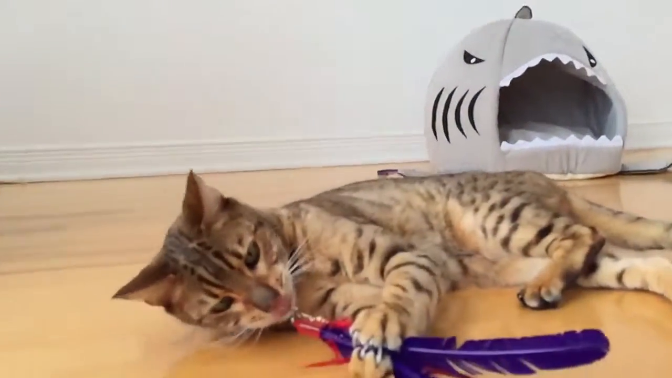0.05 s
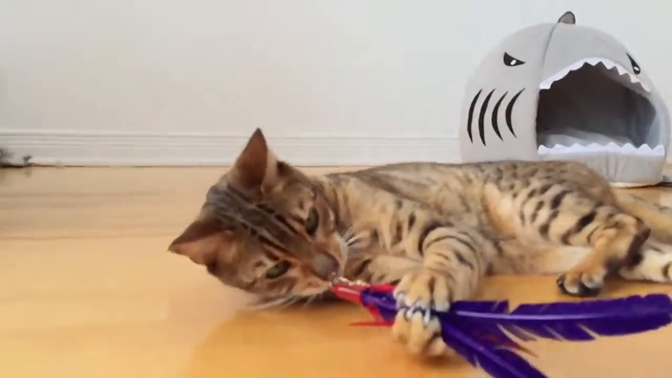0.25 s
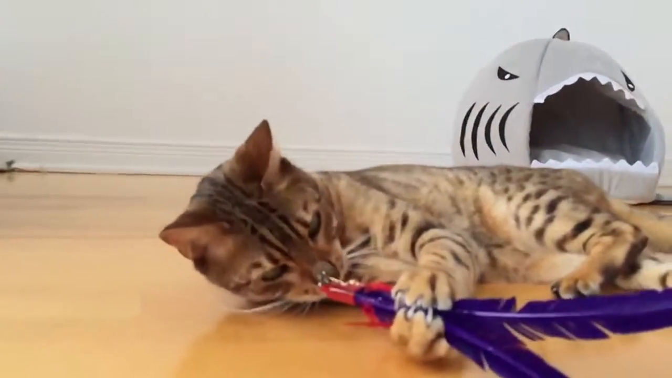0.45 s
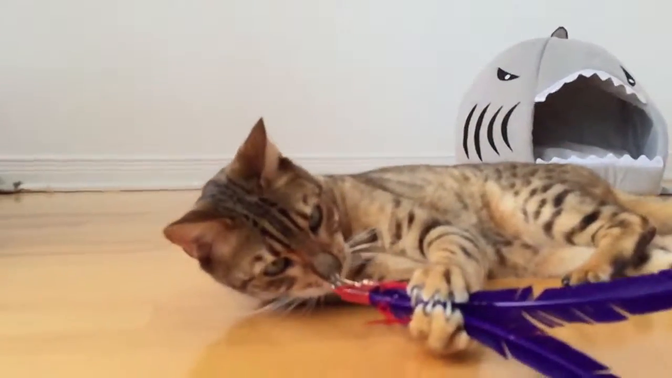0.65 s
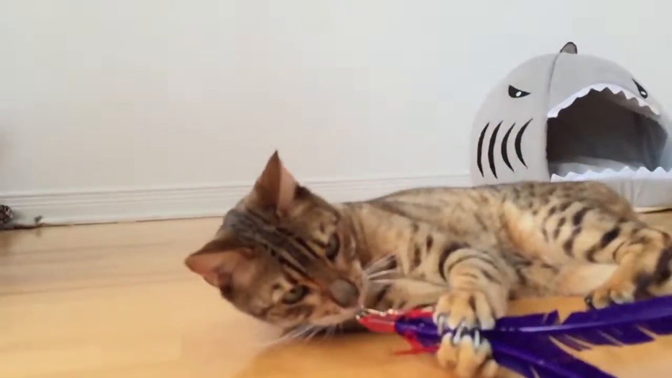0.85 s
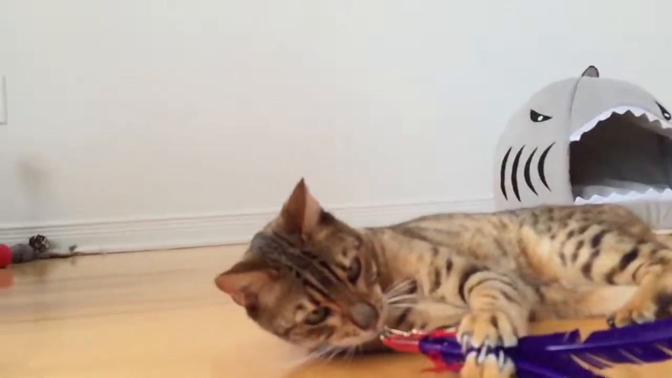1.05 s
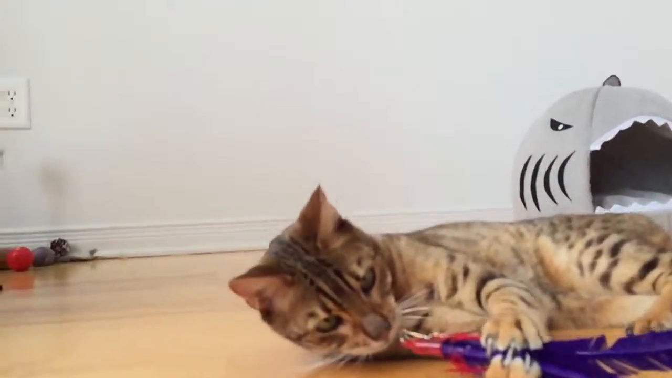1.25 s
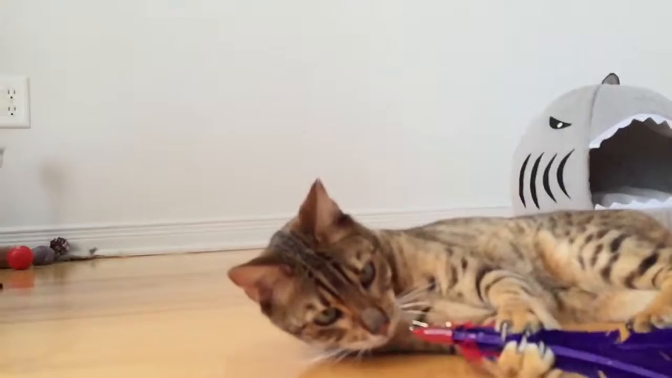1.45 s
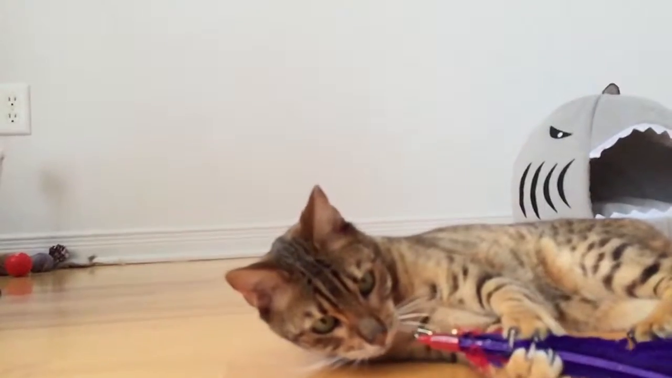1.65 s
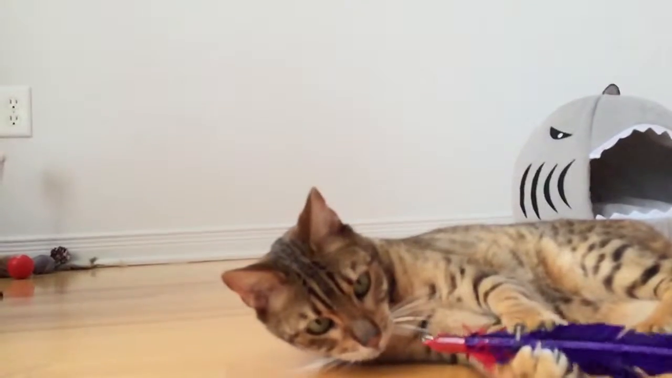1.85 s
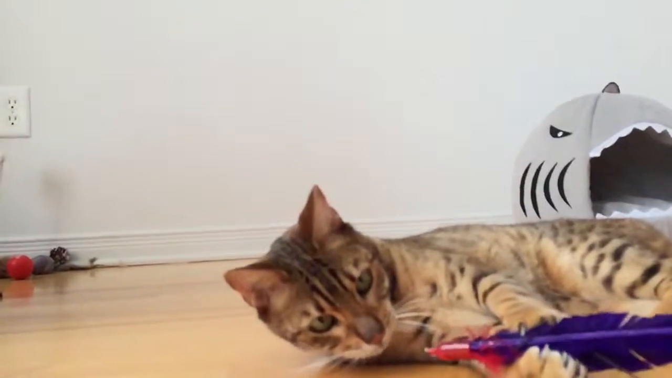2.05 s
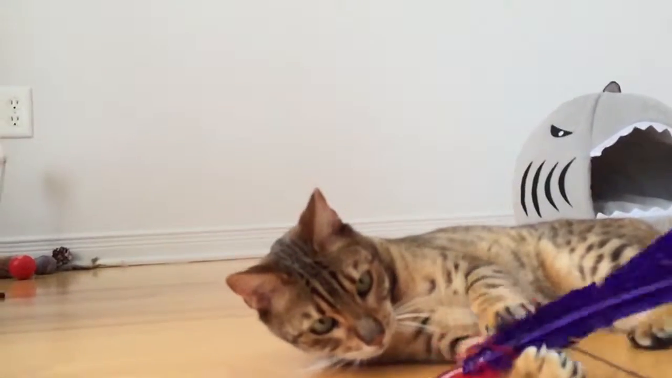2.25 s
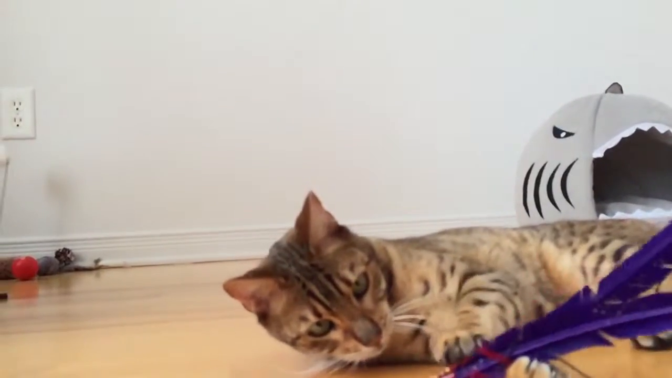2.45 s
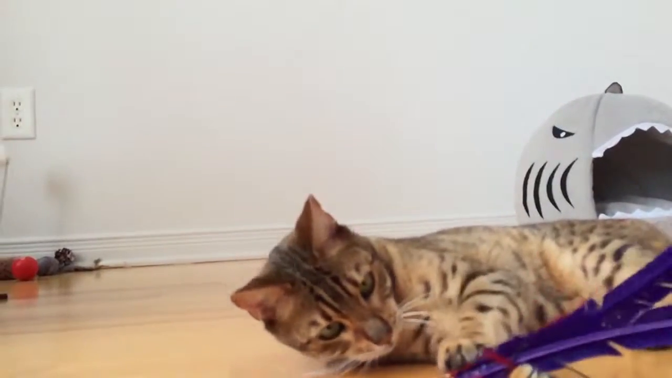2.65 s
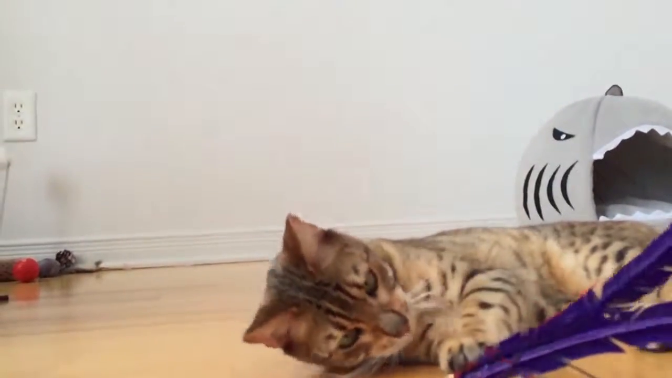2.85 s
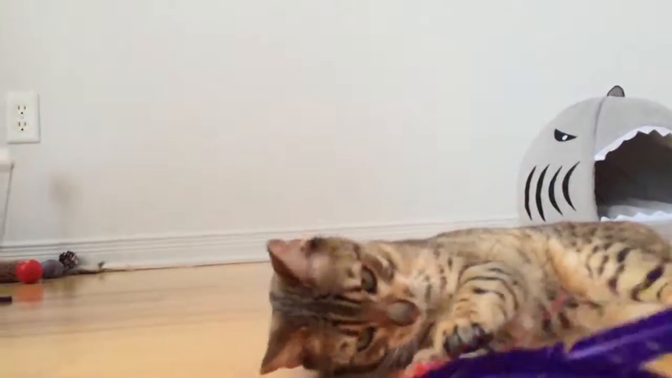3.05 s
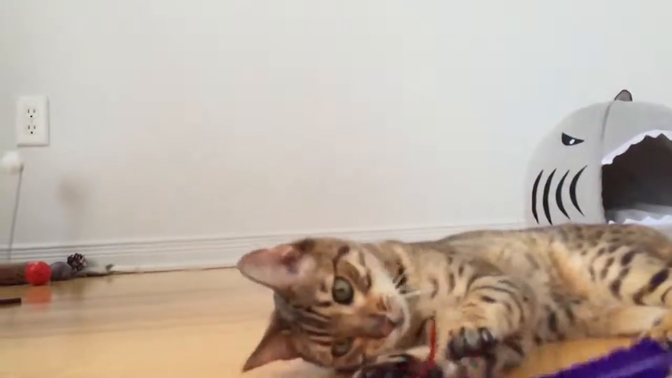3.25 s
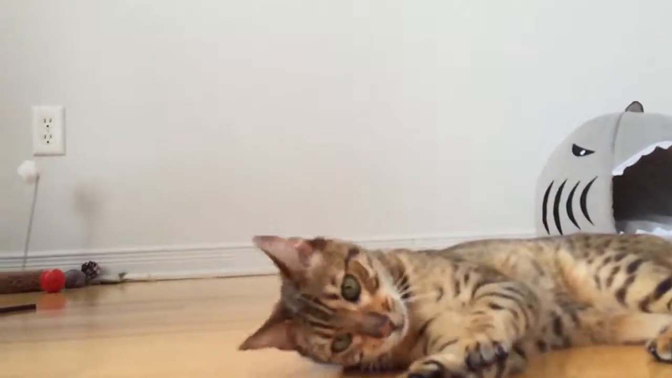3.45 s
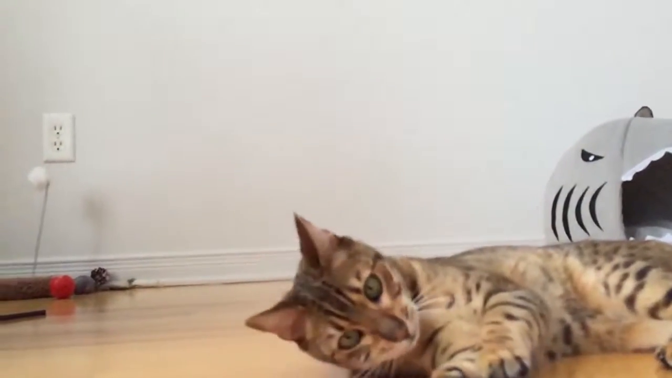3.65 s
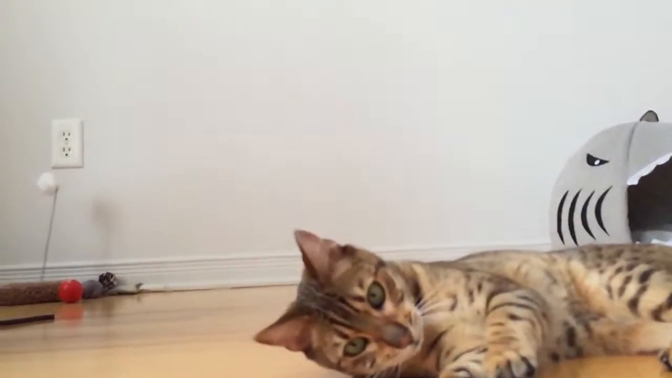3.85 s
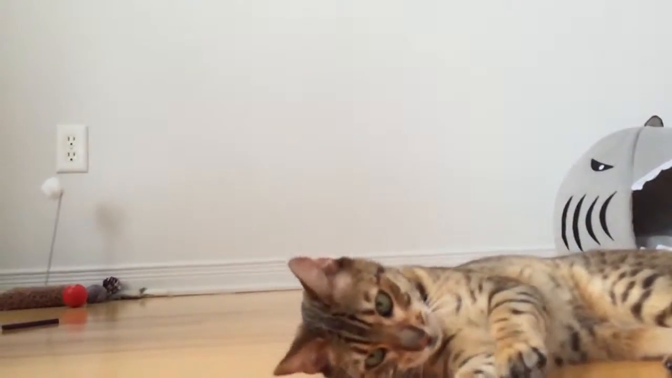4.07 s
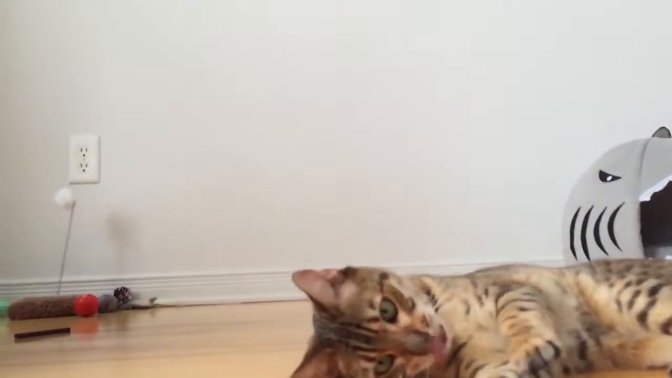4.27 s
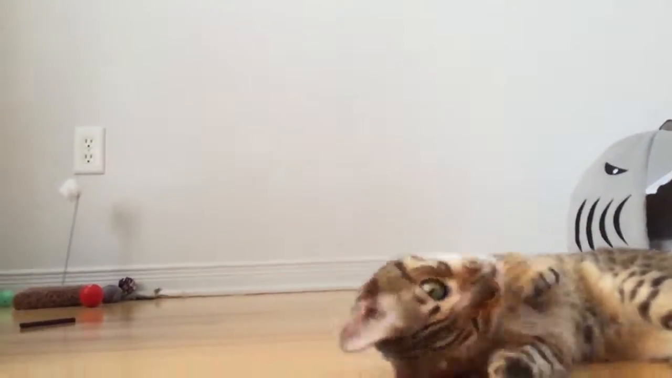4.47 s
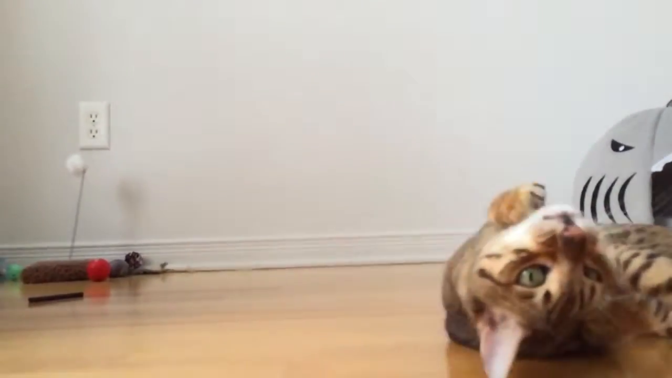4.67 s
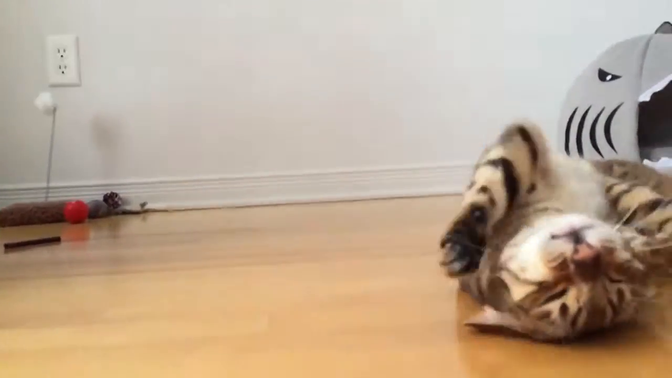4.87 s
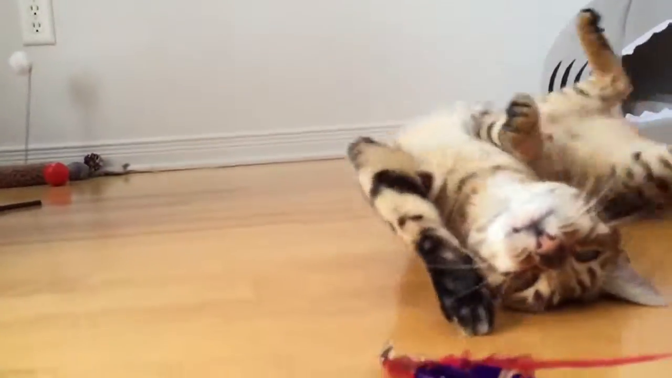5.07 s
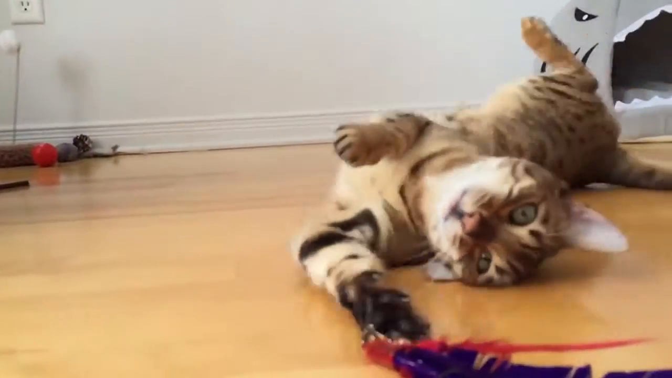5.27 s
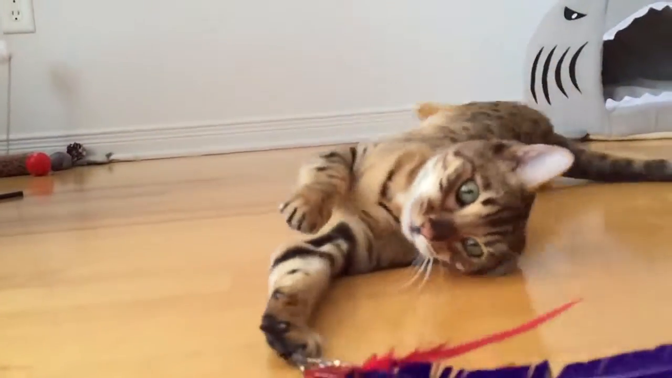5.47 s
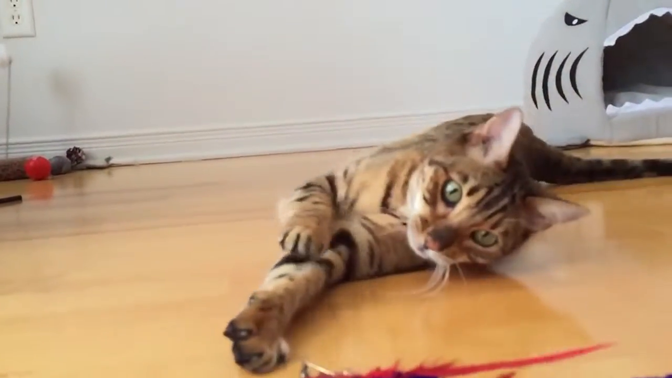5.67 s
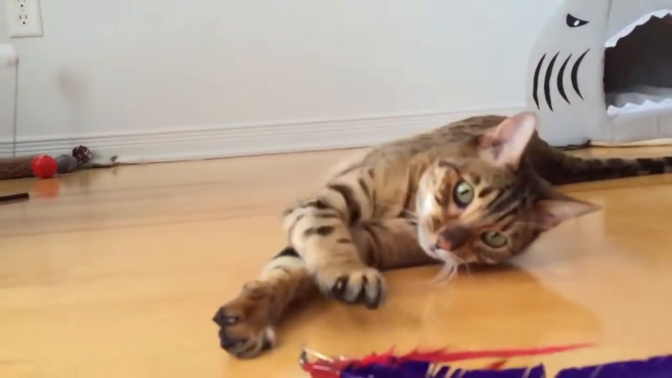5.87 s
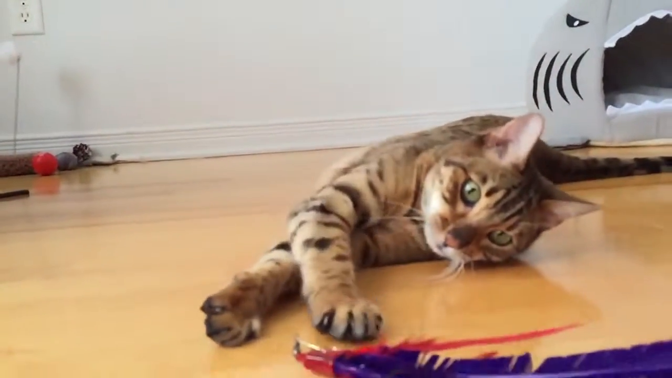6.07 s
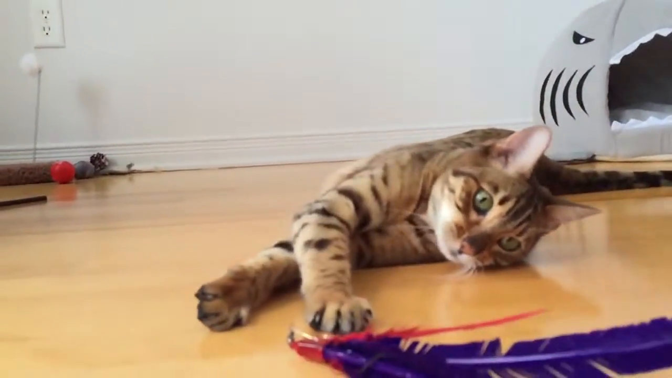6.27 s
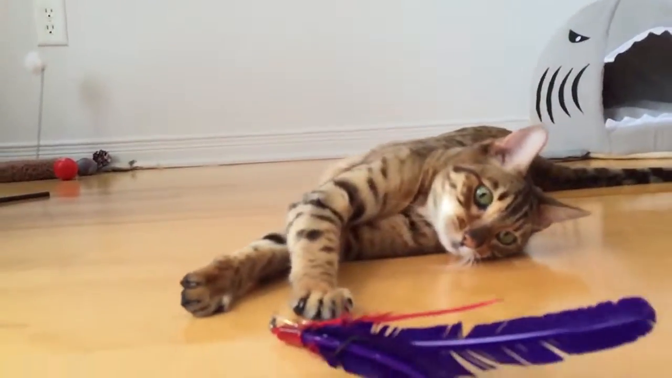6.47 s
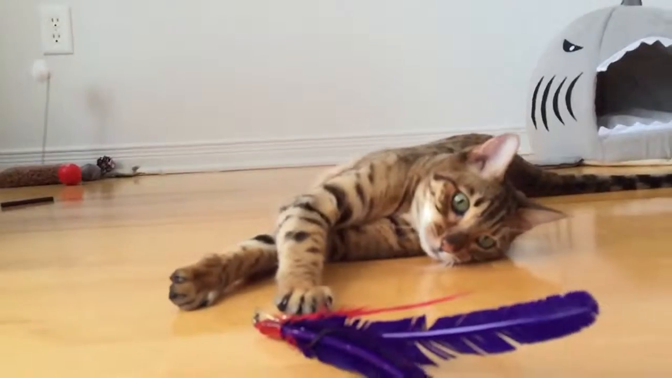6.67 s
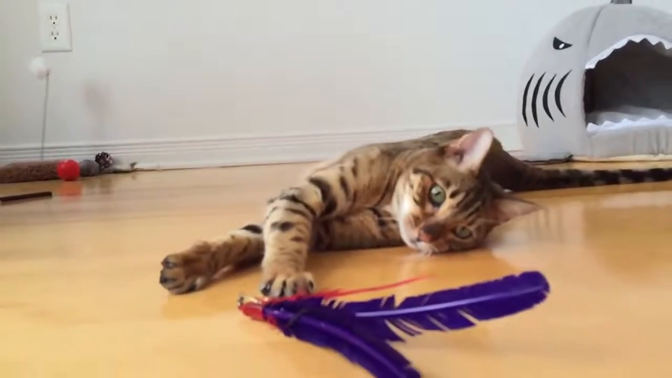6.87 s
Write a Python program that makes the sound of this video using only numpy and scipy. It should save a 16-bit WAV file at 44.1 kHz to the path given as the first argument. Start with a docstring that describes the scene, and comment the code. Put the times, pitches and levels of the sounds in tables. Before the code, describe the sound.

A bare room with a wooden floor, heard close, with a low appliance hum, wavering house rumble and faint hiss throughout. At 0.15-0.25 s a soft knock and two small hollow pops sound. From 0.6 to 1.1 s, light bumps mix with dry rattles and short scrapes of the toy's hard end, thinning to faint ticks by 1.6 s. After near quiet, a feathery brush comes at 2.1 s and a crisp, bright burst of clicks at 2.45 s. A tick follows at 3.0 s, then at 3.3-3.7 s a brush, clicks, muffled low bumps and several hollow pops. Small pops come at 4.0 and 4.4 s. At 5.05 s one heavy low thud, by far the loudest sound, rings through the boards. Faint rustles follow, soft pops and a dull bump near 5.95 s, barely audible brushes around 6.5 s, and light ticks at 6.76 s.

```python
"""In a bare, quiet room with a wooden floor, a cat plays with a feather toy. Its body and paws thump the boards
and set off their damped modes, a hollow cavity pops, and fur and feathers brush by as resonant friction noise.
A faint tone flickers in soft sine blips; the toy's hard end rattles and claws and teeth tick as struck modes.
Beneath it an appliance hums in sines and narrow noise, over noise for the house rumble and microphone hiss."""
import sys
import numpy as np
from scipy import signal
from scipy.fft import rfft, irfft, next_fast_len
from scipy.io import wavfile
from scipy.ndimage import uniform_filter1d, map_coordinates

SR = 44100
rng = np.random.default_rng(int(sys.argv[2]) if len(sys.argv) > 2 else 0)


def pcm_store(signal):
    """Save signal as 16-bit PCM."""
    levels = np.round(np.clip(np.atleast_2d(signal), -1, 1) * 32767)
    wavfile.write(sys.argv[1], SR, levels.astype(np.int16).T)


N = 304907  # length in samples


def amp(db):
    """Gain of a level in dB."""
    return 10 ** (np.asarray(db) / 20)


def unit(x):
    """x scaled to rms 1."""
    return x / np.sqrt(np.mean(x ** 2) + 1e-20)


def along(points, hz):
    """Reads a curve of (Hz, value) points on a log frequency axis."""
    point_hz, value = np.transpose(points)
    return np.interp(np.log(hz + 1), np.log(point_hz + 1), value)


def filtered(x, response):
    """Shapes the spectrum of x by a gain that depends on frequency."""
    size = next_fast_len(len(x) + 8192)
    spectrum = rfft(x, size) * response(np.fft.rfftfreq(size, 1 / SR))
    return irfft(spectrum, size)[:len(x)]


def noise(response):
    """Coloured noise of rms 1."""
    return unit(filtered(rng.standard_normal(N), response))


def wobble(rate):
    """A smooth random curve with rate knots a second."""
    knots = rng.standard_normal(int(N * rate / SR) + 4)
    return map_coordinates(knots, [np.arange(N) * rate / SR])


def ring(t, hz, db, t60, rise, wander=0):
    """A sum of damped modes with a smooth rise; wander is added to their phases."""
    hz, db, t60, rise = (np.reshape(v, (-1, 1)) for v in (hz, db, t60, rise))
    decay = amp(db - 60 * t / t60)
    onset = (1 - np.exp(-t / rise)) ** 2
    return np.sum(decay * np.sin(2 * np.pi * hz * t + wander) * onset, axis=0)


def add(track, s, sound, level_db):
    """Mixes a sound into the track from s seconds on, at a gain in dB."""
    part = track[round(s * SR):][:len(sound)]
    part += amp(level_db) * sound[:len(part)]


def peak_one(x):
    """x scaled to a peak of 1."""
    return x / np.abs(x).max()


# Lines of the appliance hum. Each row: pitch in Hz, base level in dB, noise half-width in Hz at half gain,
# depth of its own waver in dB, share of steady tone.
HUM_LINES = [(62.7, -64.5, 2.4, -3, 0.056), (82.4, -67.5, 6.4, 3, 0.33), (119.7, -64.5, 1.7, 0, 0.68),
             (131.8, -69, 3.6, 3.5, 0.11), (158.8, -77.5, 6.1, 5.5, 0.13), (179.2, -67, 3.3, -0.5, 0.76),
             (350.6, -74.5, 3.7, 2, .3), (1332, -86.5, 60, 4, 0.01)]


def hum():
    """Each line mixes a steady sine with a narrow band of noise, and wavers in level."""
    out, t = np.zeros(N), np.arange(N) / SR
    for hz, db, half_width_hz, waver_db, tone_share in HUM_LINES:
        level = amp(db + waver_db * wobble(6.4))
        tone = tone_share * np.sqrt(2) * np.sin(2 * np.pi * hz * t)
        blur = 0.57 * noise(lambda f: 1 / (1 + ((f - hz) / half_width_hz) ** 2))
        out += level * (tone + blur)
    return out


# Swells of the house rumble. Each row: time in seconds, deep level in dB, upper level in dB.
RUMBLE_LEVELS = [(0, -58, -62), (.46, -63, -68.5), (.83, -62.5, -62.5), (1.05, -69, -60), (1.6, -64, -63),
                 (2.12, -66, -62.5), (2.3, -80, -66.5), (2.62, -63, -62), (2.95, -91, -65),
                 (3.36, -56.5, -59.5), (3.72, -63.5, -64.5), (4.2, -60.5, -64), (4.69, -64.5, -64),
                 (4.93, -53.5, -59.5), (5.55, -67, -62), (5.95, -56.5, -65), (6.2, -64, -63.5),
                 (6.91, -76, -62.5)]
# Colour of the deep rumble. Each row: frequency in Hz, relative gain in dB.
DEEP_COLOUR = [(18, -55), (30, -27), (48, 2.5), (91, -9.5), (110, -8.5), (140, -32.5), (240, -120)]
# Colour of the upper rumble. Each row: frequency in Hz, relative gain in dB.
UPPER_COLOUR = [(60, -40.5), (110, 1.5), (200, -4), (350, -14.5), (700, -23.5), (1500, -45), (3000, -52)]


def rumble():
    """Two bands of low noise follow the house's swells, each with a waver of its own."""
    t = np.arange(N) / SR
    s, deep_db, upper_db = np.transpose(RUMBLE_LEVELS)
    deep_level = amp(np.interp(t, s, deep_db) + 3 * wobble(6.2))
    upper_level = amp(np.interp(t, s, upper_db) + 1.1 * wobble(7.8))
    deep = deep_level * noise(lambda f: amp(along(DEEP_COLOUR, f)))
    upper = upper_level * noise(lambda f: amp(along(UPPER_COLOUR, f)))
    return deep + upper


# Colour of the microphone hiss. Each row: frequency in Hz, relative gain in dB.
HISS_COLOUR = [(150, -37), (400, 2.5), (1000, -1), (2500, -5), (4500, -9.5), (4950, -13.5), (5400, -10),
               (8000, -14.5), (9800, -13.5), (10500, -23), (11300, -15.5), (15500, -20), (15900, -67)]


def hiss():
    """Coloured noise of the microphone, all but steady."""
    level = amp(-73 + 0.28 * wobble(10.0))
    return level * noise(lambda f: amp(along(HISS_COLOUR, f)))


def background():
    """Hum and rumble swell and sink together over the hiss."""
    swell = amp(1.2 * wobble(4.5))
    return swell * (hum() + rumble()) + hiss()


# Body and paws on the boards. Each row: start in seconds, push level in dB, push pitch in Hz,
# push length in ms (it crests after two lengths), knock level relative to the push in dB.
THUMPS = [(.146, -50.5, 292, 2.4, -10), (0.456, -53, 134, 5, -32), (0.625, -59.5, 142, 9.3, -4),
          (0.674, -47, 103, 5.5, -18), (.742, -47.5, 312, 2.45, -10), (.885, -46.5, 313, 1.9, -9),
          (0.904, -48, 334, 1.1, -13), (1.103, -45, 86.4, 8.2, -34), (3.385, -50, 111, 3.8, -28),
          (3.426, -48.5, 286, 3.1, -22), (3.4267, -33.5, 128, 4.3, -32), (3.466, -40.5, 139.6, 11.4, -21),
          (3.512, -48, 150, 4.7, -30), (3.501, -45.5, 55.7, 17, -25), (5.0473, -14, 168, 1.45, -6),
          (5.972, -42.5, 59, 8, -18)]
# Modes of floor and room. Each row: pitch in Hz, relative level in dB, 60 dB decay time in seconds.
BOARD_MODES = [(55.7, -20, 0.23), (89.1, -7, 0.48), (143.6, -2.5, 0.47), (170.6, 4, 0.17),
               (184.4, -3.5, 0.3), (204, -8.5, 0.52), (234, -10, 0.5), (268, -11.5, 0.56), (324, -14, 0.76),
               (355.6, -9, 0.48), (371, -11, 0.61), (402, -6.5, 0.46), (434.5, -13.5, 0.67),
               (502, -12.5, 0.44), (577, -25, 0.81), (546, -16, 0.62), (636, -20.5, 0.83), (703, -26, 0.28),
               (663, -22, 0.36), (870, -20, .5), (934, -42.5, .45)]
# Partials of the first knock. Each row: pitch in Hz, relative level in dB.
KNOCK_PARTIALS = [(760, 0), (1150, -10.5), (1480, -10), (1850, -20.5), (2150, -15.5), (2900, -29.5)]
RING_DB, SOFT_DB_PER_MS = -3.5, 2.25  # board ring relative to the push; a slower push rings them less
BUILD_S = 0.0069  # time constant of the ring's rise
WANDER = .017  # a board mode is never quite steady: spread of its pitch, as a share of it


def bump(u):
    """A push that swells and fades, cresting at 1 when u is 2."""
    return (u / 2) ** 2 * np.exp(2 - u)


def thumps():
    """The weight of the body bends the boards for a moment and rings the modes near the pitch of that push."""
    rung, knocks, blows = np.zeros((3, N))
    t = np.arange(SR // 2) / SR
    t_push, t_knock = t[:SR // 5], t[:SR // 50]
    hz, db, t60 = np.transpose(BOARD_MODES)
    bone = sum(amp(level_db) * np.sin(2 * np.pi * knock_hz * t_knock) for knock_hz, level_db in KNOCK_PARTIALS)
    knock = bone * bump(t_knock / 0.00088)
    # a mode is pushed up or down, depending on the spot
    signs = rng.choice([-1, 1], (len(THUMPS), len(BOARD_MODES)))
    for (s, push_db, push_hz, ms, knock_db), sign in zip(THUMPS, signs):
        too_high = (hz / (2.8 * push_hz)) ** 6
        too_low = (0.42 * push_hz / hz) ** 4
        reach_db = -10 * np.log10(1 + too_high + too_low)
        drift = unit(uniform_filter1d(rng.standard_normal((len(hz), len(t))), size=SR // 50))
        wander = 2 * np.pi * np.cumsum(WANDER * hz[:, None] * drift, axis=1) / SR
        boards = ring(t, sign * hz, db + reach_db, t60, rise=BUILD_S, wander=wander)
        add(rung, s, boards, push_db + RING_DB - SOFT_DB_PER_MS * ms)
        add(knocks, s, knock, push_db + knock_db)  # bone meets wood first
        push = -np.sin(2 * np.pi * push_hz * t_push) * bump(t_push * 1000 / ms)
        add(blows, s + 0.0024, push, push_db)
    return rung, knocks, blows


# Hollow pops. Each row: start in seconds, dry peak in dB, pitch in Hz, gain of the lower ring in dB,
# gain of the overtones in dB.
POPS = [(0.165, -32.5, 748, -10, -19.5), (0.2446, -33.5, 770, -7.5, -25), (3.342, -34, 754, -3, -9),
        (3.508, -40, 797, -29, -26), (3.571, -38, 740, -5, -26), (3.628, -39.5, 720, -3.5, -28),
        (3.69, -43, 746, 1, -19), (4.037, -37.5, 746, 4.5, -37), (4.405, -42, 753, -8, -35),
        (5.917, -45, 580, -4.5, -33), (5.949, -45, 563, -21, -27), (5.97, -46.5, 534, 0, -30)]
# Modes of the cavity. Each row: multiple of the pitch, relative level in dB, fall time in seconds.
# The last three are the lower ring and the two overtones.
CAVITY_MODES = [(.97, 1, 0.0037), (1.1, -7, 0.0066), (.7, -5.5, 0.0027), (.45, 1, 0.0041),
                (2.64, 2, 0.0026), (3.305, 1.5, 0.0054)]
POP_RISE_S = 0.00182


def pops():
    """A small cavity swells and dies within a few cycles; its modes crest together and then fall at own speeds."""
    out = np.zeros(N)
    t = np.arange(SR // 40) / SR - 2 * POP_RISE_S  # 0 at the crest
    multiple, db, fall = np.transpose(CAVITY_MODES)[..., None]
    swell = np.exp(-(t / np.where(t < 0, POP_RISE_S, fall)) ** 2)  # soft contact: smooth rise and fall
    for s, peak_db, hz, lower_db, over_db in POPS:
        level_db = db + np.c_[[0, 0, 0, lower_db, over_db, over_db]]
        modes = amp(level_db) * swell * np.cos(2 * np.pi * hz * multiple * t)
        add(out, s, peak_one(np.sum(modes, axis=0)), peak_db)
    return out


# Fur and feathers rubbing. Each row: start in seconds, length in seconds, level in dB before its fades,
# centre in Hz, width in Hz at half gain.
BRUSHES = [(0.219, 0.05, -64, 2880, 300), (0.705, 0.11, -66, 1740, 2880), (0.808, 0.019, -62.5, 740, 587),
           (0.853, 0.1, -66, 490, 530), (0.93, 0.056, -76, 6200, 900), (1.077, 0.016, -59, 790, 300),
           (1.0, .13, -67, 2000, 2000), (1.161, 0.095, -70, 2070, 900), (1.208, 0.016, -70, 3100, 490),
           (1.232, 0.025, -69, 830, 250), (1.306, 0.028, -64, 1190, 300), (1.327, 0.032, -68, 2200, 1200),
           (1.412, 0.08, -74, 2200, 2000), (2.083, 0.055, -65, 1700, 720), (2.079, 0.052, -66, 3240, 920),
           (2.08, 0.074, -68.5, 4940, 1200), (2.433, 0.049, -60.5, 3000, 4000),
           (2.471, .07, -61.5, 3630, 6000), (3.307, 0.059, -54.5, 1290, 2520),
           (3.882, 0.075, -72, 2920, 4000), (4.265, 0.065, -68, 2670, 3100), (4.7, .1, -80, 6400, 1500),
           (4.799, 0.088, -73, 1780, 1530), (5.522, 0.021, -60.5, 7460, 9600),
           (5.69, 0.028, -73, 5000, 6000), (5.85, 0.056, -76, 5400, 1220), (6.75, 0.033, -65, 1900, 1400),
           (6.448, 0.057, -71.5, 2800, 2520), (6.511, 0.036, -72, 9250, 2000)]


def brushes():
    """Grains of friction sound through one broad resonance, quick to start and slow to fade."""
    out = np.zeros(N)
    for s, length, db, hz, width_hz in BRUSHES:
        u = np.arange(SR // 5) / SR / length  # time in brush lengths
        slips, pressure = rng.standard_normal((2, len(u)))
        grains = slips * amp(4 * unit(uniform_filter1d(pressure, size=60)))
        rub = filtered(grains, lambda f: 1 / (1 + ((f - hz) / (width_hz / 2)) ** 2))
        stroke = (1 - np.exp(-u / 0.15)) * np.exp(-u ** 3.2)
        add(out, s, unit(rub) * stroke, db)
    return out


# Flickers of the faint tone. Each row: start in seconds, dry peak in dB.
FLICKERS = [(0.674, -66), (1.7568, -70.5), (1.8694, -84), (2.172, -73), (3.894, -66), (4.1415, -76),
            (5.498, -72), (5.87, -70), (6.121, -66), (6.2776, -82), (6.4685, -70)]
FLICKER_HZ, FLICKER_S = 1347, 0.0097  # pitch and half length


def flickers():
    """Short soft blips of one faint sine tone."""
    out, t = np.zeros(N), np.arange(SR // 10) / SR
    blip = np.sin(2 * np.pi * FLICKER_HZ * t) * np.exp(-(t / FLICKER_S - 1.5) ** 2)
    for s, peak_db in FLICKERS:
        add(out, s, blip, peak_db)
    return out


# The toy's hard end tapped (short) or dragged (long); the rows at .7426 s and 1.0769 s are a tap's echo off a
# wall # a few ms later. Each row: start in seconds, contact in ms, # dry peak in dB, gain of the low modes in
# dB, gain of the high modes in dB.
RATTLES = [(0.7361, 0.036, -34.5, -4.5, 2), (.7426, 0.11, -51, 14, -16), (.755, 5, -54, 4, -11),
           (.876, 3, -54.5, 7, -12), (.973, 13.7, -41.5, -1.5, 0.5), (.9801, 0.34, -39, 0, -10),
           (.990, 16, -41.5, -2.5, -6), (1.014, 9.1, -54.5, -3, -6), (1.057, 4.1, -54, -2, -3),
           (1.0695, 0.025, -34.5, -5.5, -1), (1.0769, 0.038, -38.5, 1, 2), (1.095, 4.4, -48, -5, 0),
           (1.121, 2.3, -52, -7, -10), (1.198, 8.7, -55, -6, -16), (1.218, 24, -52.5, -5, -7),
           (1.3218, .03, -43, -6, -3), (1.327, .03, -43.5, -3, -1.5), (1.42, 2.2, -59, -10, -8),
           (1.449, 2.2, -55.5, -2, -2), (1.456, 1.8, -55, -6, 4), (1.468, 15, -59, 9, -11),
           (1.558, 2.4, -58, 4, -8), (1.578, 3.3, -57, -6, -16), (1.584, 6, -49.5, -4, -10)]
# Modes of the toy's hard end. Each row: pitch in Hz, relative level in dB, 60 dB decay time in seconds.
TOY_MODES = [(766, -3, 0.036), (1107, 1, 0.019), (1630, -6, 0.029), (2004, -0.5, 0.023), (2150, 4.5, 0.017),
             (2530, -10, 0.011), (2930, -3.5, 0.018), (3200, -4, 0.016), (3890, -10, 0.011),
             (4460, -11.5, 0.016), (6000, -14.5, 0.0064), (7560, -17.5, 0.0039), (11000, -24, 0.0042)]
LOW_HZ, HIGH_HZ = 1750, 2500  # low modes lie below the first, high modes above the second


def rattles():
    """Uneven slips for as long as the contact lasts ring the toy's modes."""
    out, t = np.zeros(N), np.arange(SR // 16) / SR
    hz, db, t60 = np.transpose(TOY_MODES)
    for s, ms, peak_db, low_db, high_db in RATTLES:
        pitch, strength = rng.standard_normal((2, len(hz)))
        contact = np.exp(-(t * 1000 / ms) ** 4)
        slips = rng.standard_normal(len(t)) * amp(6 * rng.standard_normal(len(t))) * contact
        detune, uneven_db = 1 + .025 * pitch, 2 * strength
        balance_db = low_db * (hz < LOW_HZ) + high_db * (hz > HIGH_HZ)
        body = ring(t, hz * detune, db + balance_db + uneven_db, t60, rise=.5 / hz)
        add(out, s, peak_one(signal.fftconvolve(slips, body)), peak_db)
    return out


# Claws and teeth ticking on something hard; the rows at 5.0486 s and 5.064 s are the crack of the big thump's #
# knock and its bounce. Each row: start in seconds, dry peak in dB, # tilt in dB per octave, favoured pitch in
# Hz, its lift in dB, muted pitch in Hz.
CLICKS = [(2.018, -56, -4.5, 2150, 17, 940), (2.417, -48, -4, 1200, 0, 1650),
          (2.4237, -42, -4.5, 4050, 14, 2150), (2.452, -52, -6, 2150, 3, 950),
          (2.459, -50, -4, 3500, 5, 950), (2.463, -48, -5, 2400, 10, 1650),
          (2.4684, -25, 2, 10200, -1.5, 7550), (2.4707, -34.5, 0, 1600, 18, 3000),
          (2.4747, -45, -5, 5500, 2, 950), (2.477, -44, -2, 5500, 0, 950), (2.481, -45, -2, 5000, 5, 950),
          (2.483, -48, -2, 9000, 2, 950), (2.4855, -48, -3, 5500, 4, 950), (2.488, -52, -5, 2400, 5, 950),
          (2.5014, -40, -6, 2400, 1, 8000), (2.515, -53, -4, 1500, 7, 950),
          (3.0172, -50.5, -3, 4500, 4, 1300), (3.0301, -54, -4, 5800, 14, 1650),
          (3.0316, -32.5, -1.5, 1780, 8, 10800), (3.037, -55, -14, 1800, 12, 950),
          (3.3032, -30, -8, 2150, 8.5, 7000), (3.31, -36.5, -5.5, 3500, 8, 6540),
          (3.3133, -44, 0, 10000, 12, 6600), (3.318, -40, -2, 1100, 10, 8500),
          (3.3425, -44, -17, 2140, 10, 1260), (3.684, -55.5, 4, 5500, -1, 950),
          (3.895, -54.5, 0, 1250, 5, 2400), (4.3597, -53, -6.5, 1650, 5, 2720),
          (5.0486, -32.5, -11, 2600, 5, 990), (5.064, -39.5, -23, 1580, 26, 950),
          (5.197, -48.5, -11.5, 4200, 18.5, 1910), (5.207, -55, -6.5, 4000, 15, 1900),
          (5.379, -55.5, -2, 4630, 11, 2160), (5.528, -51, -3, 7850, -10, 930),
          (5.54, -49.5, -2, 4680, -4, 930), (5.643, -54, 2, 8650, 11, 950),
          (6.7583, -43.5, -7, 1910, 4, 5600), (6.763, -54, -9, 2200, 13, 940),
          (6.7758, -46, -8, 2000, 13, 3200), (6.781, -57, -9, 2000, 8, 950),
          (6.789, -47, -9.5, 2000, 7, 4500), (6.804, -61, -10, 1400, 4, 950)]
# What the ticks ring with. Each row: pitch in Hz, relative level in dB, 60 dB decay time in seconds.
HARD_MODES = [(1053, -5, 0.0087), (1310, 2.5, 0.0091), (1617, 2.5, 0.0075), (1900, 3, .007),
              (2283, 0.5, 0.0085), (2684, 3.5, 0.0074), (3416, -1, 0.0078), (4140, 5, 0.0057),
              (4750, -2.5, 0.0076), (5750, 3, 0.0066), (6830, 2.5, 0.0057), (8100, 1, 0.0051),
              (9420, 4, 0.0031), (10170, 5, 0.0038), (11860, 0.5, 0.0043), (13300, -8, 0.0038),
              (15400, -5, 0.0043)]
SPOT_OCTAVES, NODE_OCTAVES, MUTE_DB = 0.27, 0.18, -8  # reach of the favour and of the muting, and its loss


def near(hz, spot_hz, octaves):
    """1 at the spot, falling away smoothly over some octaves."""
    return np.exp(-(np.log2(hz / spot_hz) / octaves) ** 2)


def clicks():
    """The contact spot favours some modes and mutes others; harder contact tilts to the high, faster ones."""
    out, t = np.zeros(N), np.arange(SR // 30) / SR
    hz, db, t60 = np.transpose(HARD_MODES)
    rise = 0.00059 + 0.33 / hz  # high modes speak first
    for s, peak_db, tilt_db, favoured_hz, lift_db, muted_hz in CLICKS:
        pitch, strength = rng.standard_normal((2, len(hz)))
        detune, uneven_db = 1 + .03 * pitch, 1.5 * strength
        contact_db = tilt_db * np.log2(hz / 1000)
        favour_db = lift_db * near(hz, favoured_hz, SPOT_OCTAVES)
        # the spot also mutes one node higher
        nodes = near(hz, muted_hz, NODE_OCTAVES) + near(hz, 2.22 * muted_hz, NODE_OCTAVES)
        spot_db = contact_db + favour_db + MUTE_DB * nodes
        sound = ring(t, hz * detune, db + spot_db + uneven_db, t60, rise)
        add(out, s, peak_one(sound), peak_db)
    return out


# Tail of the bare room. Each row: frequency in Hz, 60 dB decay time in seconds, strength in dB.
ROOM_BANDS = [(97.5, 0.72, -4.5), (517, 0.66, -1.5), (1470, 0.63, 4.5), (5050, 0.36, 2.5), (12000, 0.17, 2)]
# First echoes off the walls. Each row: delay in seconds, level in dB.
WALL_ECHOES = [(.006, -20), (.0150, -21), (.021, -25)]


def room(x, wet_db):
    """First echoes, then a noise tail whose bands die at their own speeds, drawn anew each quarter second."""
    out, step = x.copy(), SR // 4
    band_hz, t60, strength_db = np.transpose(ROOM_BANDS)
    for delay, db in WALL_ECHOES:
        add(out, delay, x, db)
    for start in range(0, N, step):
        hz, t, z = signal.stft(rng.standard_normal(SR // 2), SR, nperseg=256)
        decay_db = -60 * t / along(np.c_[band_hz, t60], hz)[:, None]
        fade = amp(decay_db - 12 * np.exp(-t / 0.0027))  # the tail takes a moment to build
        z = z * fade / np.linalg.norm(fade, axis=1, keepdims=True)  # same energy in each band
        colour = amp(along(np.c_[band_hz, strength_db], hz))[:, None]
        tail = signal.istft(z * colour, SR, nperseg=256)[1] / np.sqrt(128)
        add(out, start / SR + 0.0049, signal.fftconvolve(x[start:start + step], tail), wet_db)
    return out


def scene():
    """The near sounds in the room over the background."""
    rung, knocks, blows = thumps()
    floor = rung + room(knocks, wet_db=-13) + room(blows, wet_db=-4.5)
    hollow = room(pops(), wet_db=-19.5)
    soft = room(brushes(), wet_db=-9.0)
    tone = room(flickers(), wet_db=-9)
    hard = room(rattles() + clicks(), wet_db=-18.5)
    return (background() + floor + hollow + soft + tone + hard)[None]


TOP_HZ = 16400  # band limit


def record(dry):
    """The microphone drops the deepest bass; nothing is kept above the band limit."""
    return filtered(dry[0], lambda f: (f < TOP_HZ) / (1 + (38 / (f + 1)) ** 6))[None]


dry = scene()
out = record(dry)
pcm_store(out)
```